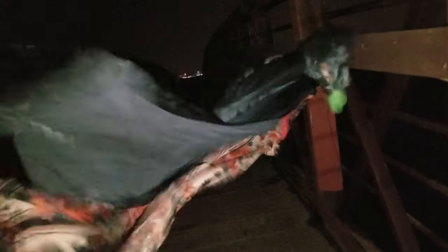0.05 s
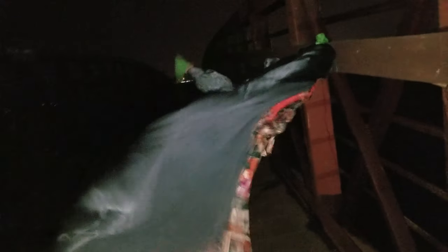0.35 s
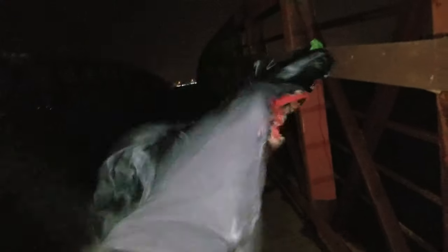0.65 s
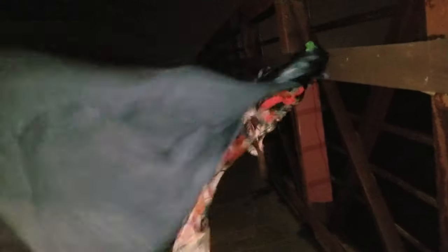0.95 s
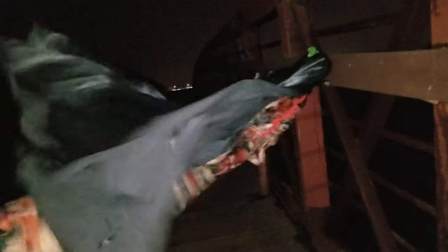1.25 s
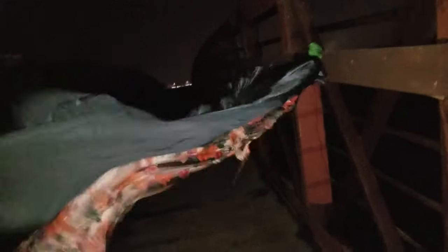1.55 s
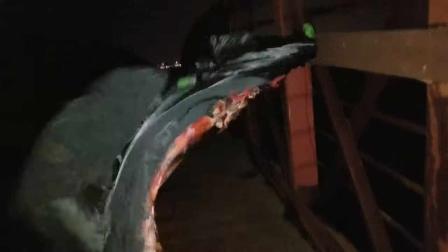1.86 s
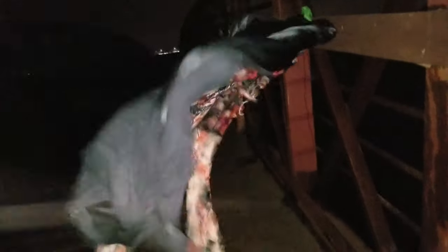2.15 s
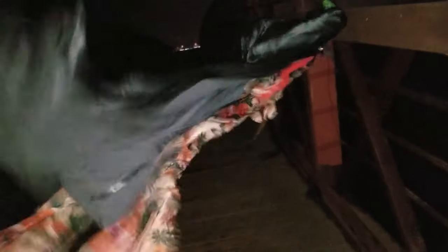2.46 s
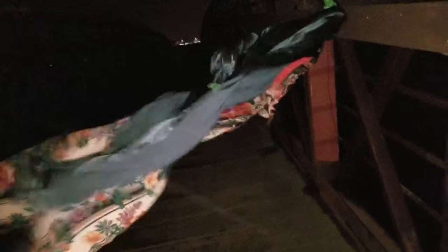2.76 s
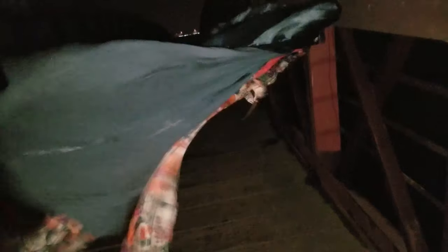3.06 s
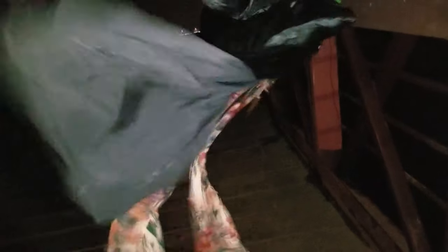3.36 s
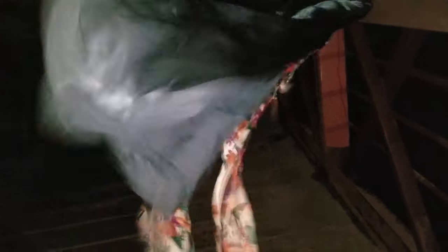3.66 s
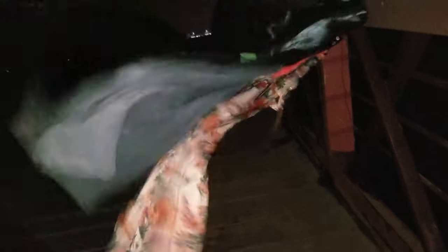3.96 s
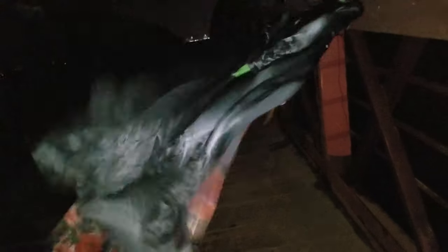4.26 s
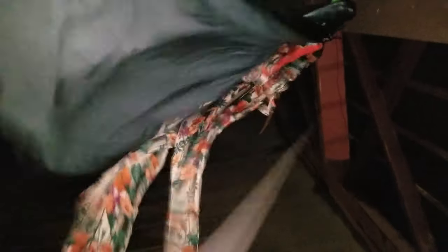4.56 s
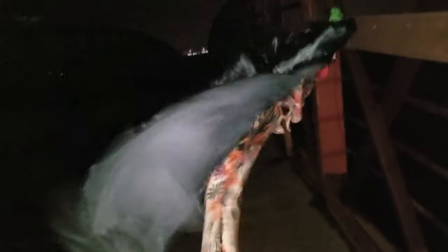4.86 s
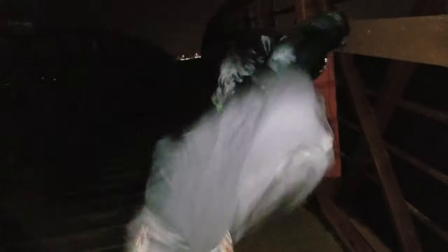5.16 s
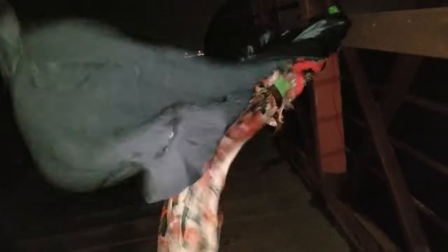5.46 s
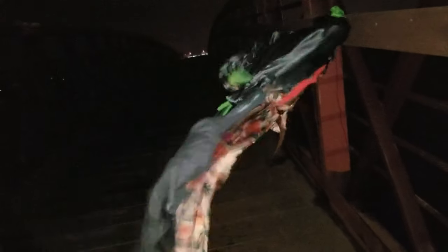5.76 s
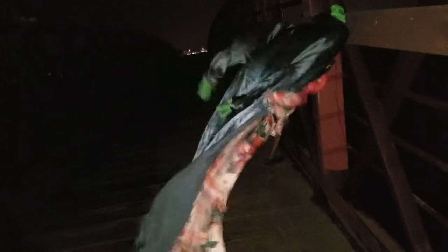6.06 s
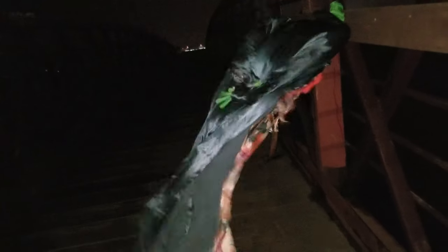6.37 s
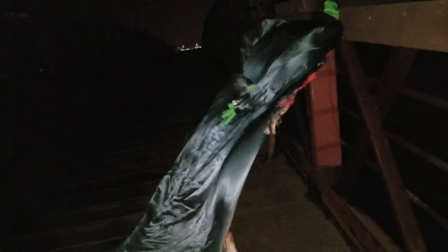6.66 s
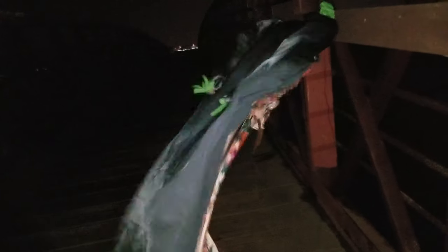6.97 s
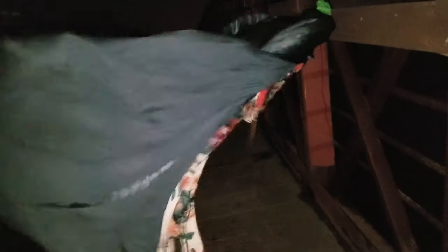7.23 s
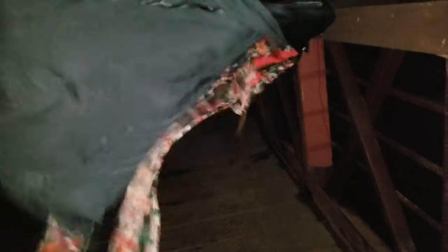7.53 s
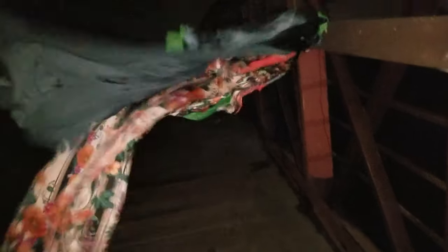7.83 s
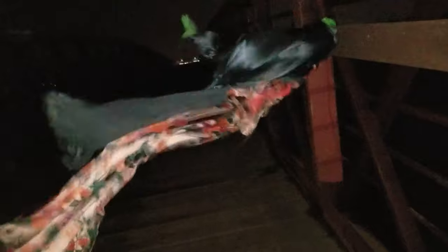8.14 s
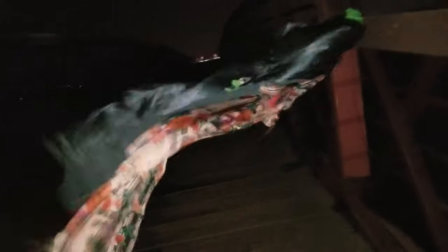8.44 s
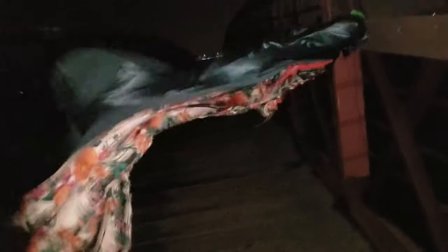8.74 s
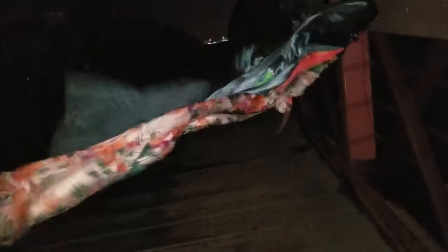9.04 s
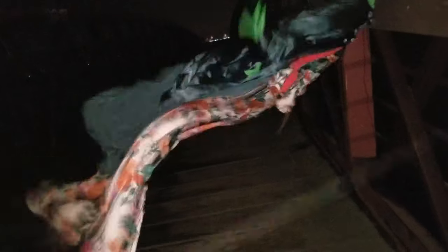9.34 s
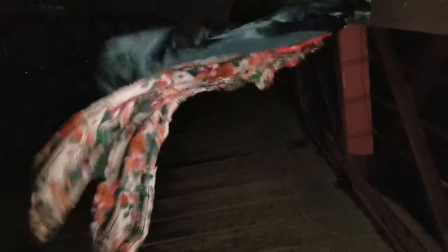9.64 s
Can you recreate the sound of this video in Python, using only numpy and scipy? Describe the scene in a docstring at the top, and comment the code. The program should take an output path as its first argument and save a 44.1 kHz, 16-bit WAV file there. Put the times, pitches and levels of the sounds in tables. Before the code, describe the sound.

Close fabric whips and flutters outdoors in soft whumps and sharp cracks, until a late gust thumps against the microphone.

```python
"""Outdoors at night, an arm's length from a two-port microphone, clothes on a beam flap in strong wind.
Each flap displaces air in a soft whump and snaps its folds in a crack; between flaps the hems flutter.
Fabric ticks against itself, garments fill with low thuds, and turbulence rumbles underneath.
Near the end a gust buffets the left port and sweeps the rustle past the right."""
import sys
import numpy as np
from scipy import signal
from scipy.fft import rfft, irfft
from scipy.io import wavfile
from scipy.ndimage import uniform_filter1d

SR = 44100
rng = np.random.default_rng(int(sys.argv[2]) if len(sys.argv) > 2 else 0)


def unload_audio(sound):
    """Save the sound as a 16-bit wav file, at the path given as the first command line argument."""
    columns = np.transpose(np.atleast_2d(sound))
    # keep every value between -1 and 1, then stretch to whole-number steps
    steps = np.round(np.clip(columns, -1, 1) * 32767)
    wavfile.write(sys.argv[1], SR, steps.astype(np.int16))


N = 432180
TIME = np.arange(N) / SR


# Flaps, from whip cracks to long shakes.
# Each row: peak time in seconds, whump level in dB, crack level in dB, length in seconds.
FLAPS = [(0.017, -18.5, -27, 0.099), (0.059, -16, -15.5, 0.0082), (0.096, -12, -26.5, 0.016),
         (0.126, -20, -23.5, 0.049), (0.205, -20, -32.5, 0.13), (0.238, -14, -30, 0.0069),
         (0.269, -15, -19, 0.032), (0.343, -28, -28, 0.029), (0.448, -17.5, -35.5, 0.016),
         (0.509, -19, -35, 0.0045), (0.531, -9.5, -25, 0.018), (0.604, -11, -17, 0.047),
         (0.65, -25, -24, 0.019), (0.67, -13.5, -19, 0.0038), (0.718, -19, -29, 0.1),
         (0.87, -11.5, -19.5, 0.0095), (0.886, -23, -27.5, 0.028), (0.919, -23, -23, 0.015),
         (0.94, -19.5, -30, 0.076), (1.165, -17, -20.5, 0.024), (1.272, -14, -27, 0.039),
         (1.313, -21, -29, 0.033), (1.355, -13, -22.5, 0.014), (1.428, -19, -30.5, 0.044),
         (1.549, -22, -28, 0.026), (1.67, -13, -28, 0.027), (1.716, -22.5, -25.5, 0.053),
         (1.817, -15, -27, 0.015), (1.861, -21, -26, 0.078), (1.945, -19, -34, 0.13),
         (1.985, -15, -21.5, 0.01), (2.083, -16.5, -22.5, 0.031), (2.133, -15, -23.0, 0.073),
         (2.227, -15.5, -26.5, 0.014), (2.278, -22, -22, 0.012), (2.302, -17.5, -34, 0.098),
         (2.438, -22.5, -30.5, 0.023), (2.51, -18.5, -25, 0.03), (2.586, -21.5, -28, 0.027),
         (2.641, -19, -32, 0.052), (2.786, -19, -29, 0.14), (2.854, -31, -19.5, 0.009),
         (2.95, -16, -28.5, 0.035), (3.032, -19.5, -30, 0.036), (3.079, -14, -23.5, 0.017),
         (3.303, -16.5, -29.5, 0.014), (3.346, -14, -28, 0.043), (3.414, -16.5, -21.5, 0.029),
         (3.492, -21.5, -30, 0.076), (3.536, -21, -20.5, 0.017), (3.602, -16, -26, 0.075),
         (3.729, -18.5, -21.5, 0.016), (3.777, -18, -27.0, 0.083), (3.857, -16, -30.5, 0.064),
         (3.857, -11.0, -24, 0.0046), (3.905, -14, -22, 0.017), (3.96, -19, -29.5, 0.056),
         (4.062, -12, -25.5, 0.015), (4.14, -14, -25, 0.011), (4.172, -23, -32, 0.12),
         (4.281, -16.5, -24, 0.038), (4.364, -13, -27.0, 0.022), (4.657, -12.5, -26, 0.022),
         (4.757, -17, -33.0, 0.044), (4.836, -17.0, -26.5, 0.086), (4.973, -11.5, -25.5, 0.021),
         (5.029, -17.5, -30, 0.15), (5.09, -17, -20.5, 0.0072), (5.145, -18.5, -27.5, 0.066),
         (5.217, -16, -25.5, 0.084), (5.273, -13, -29, 0.045), (5.36, -19.5, -30, 0.016),
         (5.433, -16.5, -29.5, 0.057), (5.5, -8.5, -20, 0.029), (5.613, -13.5, -31, 0.035),
         (5.662, -18, -21.5, 0.021), (5.697, -17, -26, 0.064), (5.781, -15.5, -27.5, 0.025),
         (5.819, -17, -26, 0.066), (5.926, -7, -28.5, 0.0098), (6.05, -15.5, -34, 0.03),
         (6.14, -19, -35, 0.12), (6.158, -19, -24, 0.026), (6.221, -14, -28.5, 0.0068),
         (6.301, -17.5, -32.5, 0.059), (6.537, -17, -31, 0.025), (6.626, -25, -26.5, 0.021),
         (6.671, -17.5, -35.5, 0.11), (6.812, -12, -31, 0.014), (6.876, -12.5, -29.5, 0.015),
         (6.925, -15, -36, 0.037), (6.96, -2.5, -22, 0.006), (6.989, -21, -32.5, 0.071),
         (7.016, -7.5, -15, 0.0062), (7.113, -15, -35, 0.06), (7.194, -22.5, -30.5, 0.017),
         (7.271, -19.5, -33, 0.076), (7.59, -17, -33, 0.04), (7.721, -14.5, -26.5, 0.017),
         (7.78, -21.5, -45, 0.033), (7.932, -18.5, -34, 0.026), (7.975, -11, -33, 0.0097),
         (8.021, -13, -25.5, 0.01), (8.081, -24, -29.5, 0.0044), (8.254, -15, -32.5, 0.016),
         (8.322, -17, -46, 0.052), (8.507, -16.5, -24, 0.024), (8.623, -16, -25, 0.096),
         (8.725, -17, -32, 0.12), (8.858, -24, -30, 0.035), (8.918, -21, -26, 0.014),
         (9.066, -17.5, -31, 0.041), (9.155, -16, -32.5, 0.081), (9.222, -22, -30, 0.11),
         (9.375, -20, -31, 0.022), (9.53, -31, -30.5, 0.062)]
def flaps(crack_lag_s=0):
    """Air displacement and sudden tension: the whump power and crack power of the flaps."""
    return swells(FLAPS, crack_lag_s)


def hem_flutter(flicks_per_s=42, spread_db=4.5, length_s=0.021):
    """Aeroelastic flutter: whump and crack power of small uneven flicks, livelier around each flap."""
    gap, force, stretch = rng.standard_normal((800, 3)).T
    times = np.cumsum(np.exp(0.4 * gap)) / flicks_per_s
    force_db = spread_db * np.clip(force, -2, 2)
    lengths = length_s * np.exp(0.5 * stretch)
    flicks = swells(zip(times, 0.1 * force_db, force_db, lengths))   # harder flicks are crisper
    shaken = np.abs(uniform_filter1d(flaps(), int(0.15 * SR), axis=1))
    lull_db, shake_db = [[-23.5], [-44]], [[-10.5], [-19.5]]   # whump, crack
    power = from_db(lull_db) ** 2 + from_db(shake_db) ** 2 * shaken
    return (flicks / flicks.mean(axis=1, keepdims=True) + 0.033) * power


def folds(per_s=3500, spread_db=5.5):
    """Shot noise: folds flick over in pressure pulses, a few large among many small, separate per port."""
    born = rng.random((2, N)) < per_s / SR
    sizes = from_db(spread_db * np.minimum(rng.exponential(1, (2, N)), 5))
    return born * sizes * rng.choice([-1, 1], (2, N))


def edge_diffraction(x, path_s, share):
    """Dipole interference: each pulse returns inverted round the sheet's edge, by a shifting path."""
    lag = np.rint(path_s * SR * np.exp(0.45 * drift(9))).astype(int)
    delayed = np.take_along_axis(x, np.maximum(np.arange(N) - lag, 0), axis=1)
    return x - share * delayed


# Spectrum of the cloth. Each row: frequency in Hz, relative density in dB.
CLOTH_SPECTRUM = [(45, -17.5), (100, -4), (170, -3), (260, -1), (400, -3.5), (630, -7), (1000, -8.5),
                  (2000, -13.5), (3600, -21), (5000, -30), (7200, -46.5), (9000, -47.5), (12000, -53),
                  (16000, -69.5)]
# How each band is driven. Each row: frequency in Hz, crispness (0 follows the whump, 1 the crack).
CRISPNESS = [(130, 0.042), (400, 0.26), (800, 0.55), (1400, 0.81), (2600, 1.24), (5000, 1.75),
             (12000, 1.65)]
def cloth(exposure):
    """Amplitude modulation of fold pulses by band: the bass follows the whump, the treble the crack."""
    whump, crack = np.sqrt(flaps(crack_lag_s=0.0022) + hem_flutter())
    sharpness = from_db(8.5) * crack / whump
    ripple = from_db(drift(37.7)[0])   # waves running down the cloth make each flap throb
    pulses = edge_diffraction(folds(), path_s=0.0009, share=0.49)
    pulses = edge_diffraction(pulses, path_s=0.002, share=0.48)
    pulses = colour(pulses, CLOTH_SPECTRUM)
    crinkle = (drift(110) + drift(150)[0]) / np.sqrt(2)   # wrinkle clusters, partly shared by the ports
    knots_hz, crispness = np.transpose(CRISPNESS)
    edges_hz = np.geomspace(55, 17000, 13)
    sound = 0
    for k, (low, high) in enumerate(zip(edges_hz, edges_hz[1:])):
        crisp = np.interp(np.log(low * high) / 2, np.log(knots_hz), crispness)
        tone_db = (0.95 + 0.82 * crisp) * drift(18.3)   # folds of changing size shift the colour
        crinkle_db = crisp ** 2 * (2.0 * crinkle - 2.5)
        level = whump * sharpness ** crisp * from_db(tone_db + crinkle_db)
        ports = from_db(crisp * exposure * np.array([[-16.9], [7.9]]))   # the gust carries treble right
        bandpass = signal.butter(2, [low, high], "band", fs=SR, output="sos")
        rustle = even(signal.sosfilt(bandpass, pulses), span_s=0.034 + 3.9 / high)
        sound = sound + (-1) ** k * rustle * level * ports
    return sound * ripple


# Strong ticks. Each row: peak time in seconds, crackle level in dB, sparkle level in dB.
TICKS = [(0.06, -24.5, -51), (0.92, -23, -51), (1.123, -62, -51), (1.56, -33, -44.5), (1.746, -28.5, -56),
         (3.083, -29, -48), (3.619, -21, -53), (3.994, -43, -49), (5.106, -37, -54), (5.156, -33, -38),
         (6.457, -37, -47), (6.744, -38, -54), (7.174, -47, -48), (8.203, -38.5, -49), (8.318, -41, -71),
         (8.428, -39, -50)]
# Spectra of the crackle and the higher sparkle. Each row: frequency in Hz, relative density in dB.
CRACKLE_SPECTRUM = [(1500, 6), (4200, 6.5), (7400, -12), (9000, -8.5), (16000, -31.5)]
SPARKLE_SPECTRUM = [(8000, -5), (13000, 2), (16000, -2)]
def ticks(light_per_s=18, strong_length_s=0.0054):
    """Brief impacts have broad spectra: fabric flicks against itself in strong and light ticks."""
    gap, force = rng.random((300, 2)).T
    times = np.cumsum(-np.log(gap)) / light_per_s
    light = from_db(-49) * bursts(zip(times, 12 * force), length_s=0.0021)
    strong, sparkle = np.sqrt(swells((*row, strong_length_s) for row in TICKS))
    crackle = (strong + light) * even(noise(CRACKLE_SPECTRUM), span_s=0.0027)
    return (crackle + sparkle * noise(SPARKLE_SPECTRUM)) * pan(-2.0)


# Thuds of the cloth filling. Each row: peak time in seconds, relative level in dB.
BILLOWS = [(0.596, -23), (1.731, -13), (3.065, -16.5)]
# Spectrum of slow air motion, in billows and wind. Each row: frequency in Hz, relative density in dB.
RUMBLE_SPECTRUM = [(25, -27.5), (50, -6), (75, -6), (130, -5.5), (600, -29.5)]
def billows():
    """Volume displacement: a garment filling with air makes a few slow pressure swings."""
    swings = even(noise(RUMBLE_SPECTRUM), span_s=0.017)
    return from_db(-1.0) * bursts(BILLOWS, length_s=0.017) * swings


GUST_START_S = 8.468
def wind_exposure(lag_s, rise_s, sheltered=0.072, exposed=0.87):
    """Advection of a gust front: the share of the full wind that is felt ramps up as it arrives."""
    arrival_s = GUST_START_S + lag_s
    return np.interp(TIME, [arrival_s, arrival_s + rise_s], [sheltered, exposed])


# Large eddies in the gust. Each row: peak time in seconds, relative level in dB.
EDDIES = [(8.545, -5), (8.705, -7), (8.925, -15), (9.03, -14), (9.115, -9), (9.295, -19), (9.37, -18.5),
          (9.745, -20)]
# Spectrum of the buffeting. Each row: frequency in Hz, relative density in dB.
BUFFET_SPECTRUM = [(18, -12), (75, -5.5), (130, -7), (300, -12.5), (2000, -62)]
def buffeting(fade_db_per_s=6.5):
    """Turbulent pressure: eddies thump on the windward left port as the gust dies away."""
    age = np.maximum(TIME - GUST_START_S, 0)
    fading = from_db(-15.5 - fade_db_per_s * age)
    level = np.hypot(fading, bursts(EDDIES, length_s=0.045))
    return level * even(noise(BUFFET_SPECTRUM), span_s=0.078) * pan(11.5)


# Spectrum of the rush. Each row: frequency in Hz, relative density in dB.
RUSH_SPECTRUM = [(700, 3), (2000, 2), (4000, -4.5), (7300, -24.5), (9000, -22.5), (16000, -35.5)]
def wind_rush(gust_strength):
    """Flow noise: a crackling rush of wind on the right port, surging with every flap."""
    _, crack_power = flaps()
    surge = gust_strength * np.sqrt(crack_power + from_db(-29) ** 2)
    crackle_db = 4.8 * drift(150) + 5.4 * drift(19)   # quick crackle in slower bursts
    rush = even(colour(folds(), RUSH_SPECTRUM), span_s=0.012)
    return surge * rush * from_db(crackle_db - 6) * pan(-21)


# Faint hiss of air, swelling with the gust. Each row: time in seconds, level in dB.
HISS_LEVEL = [(7.7, -41.5), (8.5, -34), (9.2, -40), (9.8, -64)]
# Spectrum of the hiss. Each row: frequency in Hz, relative density in dB.
HISS_SPECTRUM = [(500, 18), (3000, -30), (7000, -33), (9000, -28), (16000, -31.5)]
def wind():
    """Broadband turbulence: an uneven low rumble under a faint hiss."""
    rumble = noise(RUMBLE_SPECTRUM) * from_db(-35.5 + 0.93 * drift(12.0))
    hiss_db = np.interp(TIME, *np.transpose(HISS_LEVEL))
    return rumble + from_db(hiss_db) * noise(HISS_SPECTRUM)


def swells(rows, high_lag_s=0):
    """Incoherent bursts add in power: low and high envelopes from rows of peak s, dB, dB, length s."""
    power = np.zeros((2, N))
    for peak_s, low_db, high_db, length_s in rows:
        attack_s = 0.0018 + 0.12 * length_s
        near = slice(*np.searchsorted(TIME, [peak_s - np.pi * attack_s, peak_s + np.pi * length_s]))
        age = TIME[near] - peak_s - np.array([[0], [high_lag_s]])
        shape = np.exp(-np.where(age < 0, (age / attack_s) ** 2, np.abs(age / length_s) ** 2.13))
        power[:, near] += (from_db([[low_db], [high_db]]) * shape) ** 2
    return power


def bursts(rows, length_s):
    """Amplitude is the root of power: one envelope from rows of peak time in seconds, level in dB."""
    return np.sqrt(swells((s, db, db, length_s) for s, db in rows)[0])


def noise(spectrum):
    """Filtered Gaussian noise, independent at each port."""
    return colour(rng.standard_normal((2, N)), spectrum)


def colour(x, spectrum, size=16384):
    """Minimum-phase filtering to a spectrum that falls away past its ends; the result has unit rms."""
    hz = np.maximum(np.arange(size // 2 + 1) * SR / size, 1)
    knots_hz, db = np.transpose(spectrum)
    rolloff = np.minimum(1, np.minimum(hz / knots_hz[0], knots_hz[-1] / hz)) ** 2
    gain = rolloff * from_db(np.interp(np.log(hz), np.log(knots_hz), db))
    cepstrum = irfft(np.log(gain), size)
    impulse = irfft(np.exp(rfft(2 * cepstrum[:size // 2], size)), size)
    return rms_one(signal.oaconvolve(x, impulse[None], axes=1)[:, :N])


def even(x, span_s):
    """Division by the running rms steadies the level and keeps pulses shorter than the span."""
    width = max(int(span_s * SR), 2)
    power = uniform_filter1d(uniform_filter1d(rms_one(x) ** 2, width), width)
    return x / np.sqrt(np.abs(power) + 1e-6)


def drift(rate_hz):
    """Low-pass noise: a random wander of unit spread, independent at each port."""
    lowpass = signal.butter(2, rate_hz, fs=1000, output="sos")
    grid_s = np.arange(12000) / 1000
    slow = rms_one(signal.sosfilt(lowpass, rng.standard_normal((2, grid_s.size))))
    return np.array([np.interp(TIME + 2, grid_s, row) for row in slow])


def pan(left_db):
    """Constant-power panning for a left-minus-right level difference."""
    return rms_one(from_db(np.array([[left_db], [-left_db]]) / 2))


def rms_one(x):
    """Normalisation to unit rms."""
    return x / np.sqrt(np.mean(x ** 2) + 1e-20)


def from_db(db):
    """Decibels to amplitude ratio."""
    return 10 ** (np.asarray(db) / 20)


def scene():
    """Superposition in a free field; the gust reaches the microphone first, then the cloth."""
    at_microphone = wind_exposure(lag_s=0, rise_s=0.0088)
    at_cloth = wind_exposure(lag_s=0.083, rise_s=0.034)
    clothes = cloth(at_cloth) + ticks() + billows()
    return clothes + wind() + at_microphone * (buffeting() + wind_rush(at_cloth))


def record(dry, cutoff_hz=15600):
    """Soft saturation rounds the highest peaks; a steep low-pass cuts the top."""
    rounded = dry / (1 + dry ** 6) ** (1 / 6)
    return signal.sosfilt(signal.ellip(10, 0.1, 70, cutoff_hz, fs=SR, output="sos"), rounded)


dry = scene()
out = record(dry)
unload_audio(out)
```